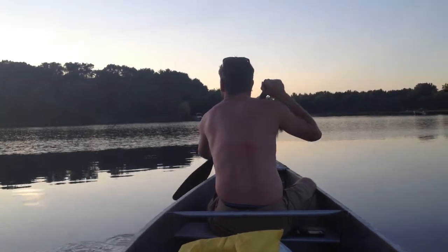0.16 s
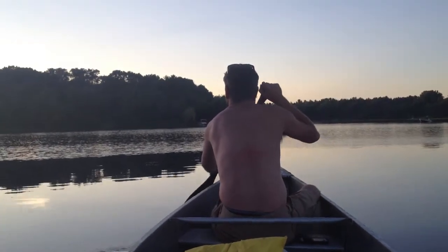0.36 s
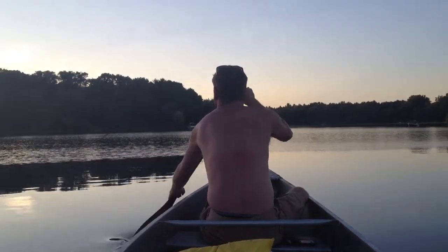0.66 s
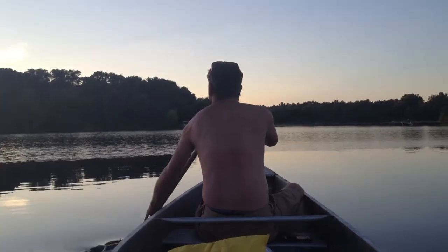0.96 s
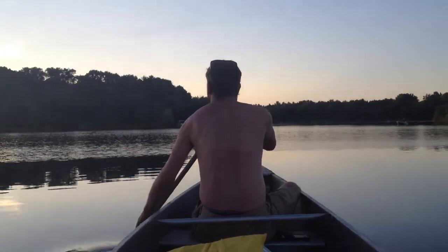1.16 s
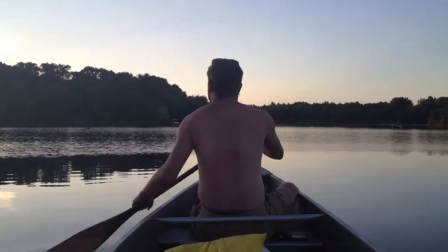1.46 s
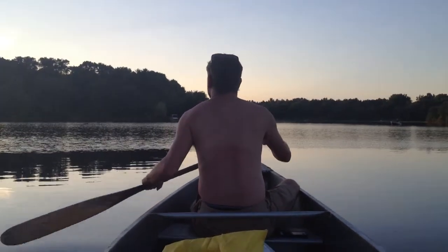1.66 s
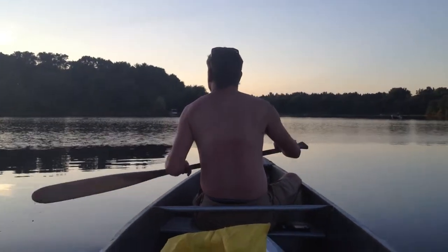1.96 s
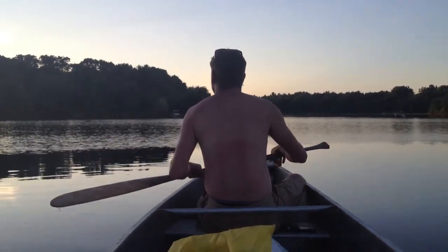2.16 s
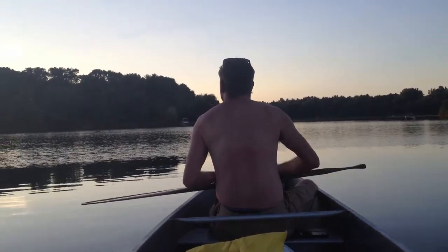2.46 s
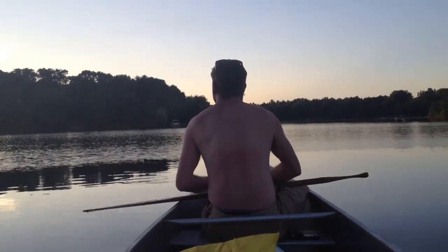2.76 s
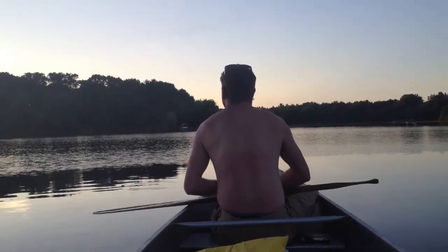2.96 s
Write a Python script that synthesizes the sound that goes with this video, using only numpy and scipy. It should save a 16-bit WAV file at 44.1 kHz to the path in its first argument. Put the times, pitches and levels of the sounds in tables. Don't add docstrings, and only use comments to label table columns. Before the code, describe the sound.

Near the microphone, water softly gurgles around a paddle and drops plink as it lifts; hands rub the shaft, then it knocks sharply on the aluminium hull, ringing briefly over a faint outdoor hum.

```python
import sys
import numpy as np
from scipy import signal
from scipy.fft import rfft, irfft
from scipy.io import wavfile

SR = 44100
rng = np.random.default_rng(int(sys.argv[2]) if len(sys.argv) > 2 else 0)


def nominal_scale(level):
    x = np.asarray(level, float) / 20
    return 10 ** x


def unload_wav(signal):
    wavfile.write(
        sys.argv[1],
        SR,
        np.round(np.clip(np.atleast_2d(signal).T, -1, 1) * 32767).astype(np.int16),
    )


N = 136710
TOP_HZ = 15450


def rms_one(x):
    return x / np.sqrt(np.mean(x ** 2) + 1e-20)


def level(rows):
    seconds, db = np.transpose(rows)
    return nominal_scale(np.interp(np.arange(N) / SR, seconds, db))


def at_hz(points, hz, column=1):
    points = np.array(points)
    return np.interp(np.log(hz), np.log(points[:, 0]), points[:, column])


def drift(rate_hz):
    hop = 40
    pole = np.exp(-2 * np.pi * hop * rate_hz / SR)
    white = rng.standard_normal(N // hop + 2002)
    slow = signal.lfilter([1], [1, -2 * pole, pole * pole], white)[2000:]
    return np.interp(np.arange(N) / hop, np.arange(len(slow)), rms_one(slow))


def ring(clicks, hz, t60):
    radius = 1000.0 ** (-1 / (t60 * SR))
    angle = 2 * np.pi * hz / SR
    poles = [1, -2 * radius * np.cos(angle), radius * radius]
    return signal.lfilter([0, np.sin(angle)], poles, clicks + 1e-18)


def coloured(spectrum, bumps, patchy_db):
    hz = np.maximum(np.fft.rfftfreq(N, 1 / SR), 1)
    db = at_hz(spectrum, hz)
    for centre, width, gain in bumps:
        db = db + gain * np.exp(-((hz - centre) / width) ** 2)
    full = rfft(rng.standard_normal(N)) * nominal_scale(db) * (hz < TOP_HZ)
    octave = np.clip(np.log2(hz / 30), 0, 9)
    out = np.zeros(N)
    for k in range(10):
        overlap = np.clip(1 - abs(octave - k), 0, 1)
        out += irfft(full * overlap, N) * nominal_scale(patchy_db * drift(8.2))
    return rms_one(out)


# frequency in Hz, density in dB per Hz.
AIR_SPECTRUM = [(15, -89), (25, -38.5), (194, -2), (686, -9), (923, -7), (2370, -26.5), (3270, -33),
                (3640, -29.5), (15600, -34.5)]
# centre in Hz, width in Hz, height in dB.
AIR_BUMPS = [(117.7, 31, 8), (950, 54, 1.5), (7500, 1000, 2), (10400, 1380, -9)]


def distant_air():
    return nominal_scale(-57) * coloured(AIR_SPECTRUM, AIR_BUMPS, patchy_db=.5)


# time in seconds, level in dB.
INSECT_LEVEL = [
    (.45, -96),
    (.55, -80),
    (1.18, -80),
    (1.27, -92),
    (1.7, -88),
    (1.9, -80),
    (3.1, -82),
]


def insects():
    hz, width_hz = 4550, 270
    hiss = rng.standard_normal(N)
    for _ in range(2):
        hiss = ring(hiss, hz, 2.2 / width_hz)
    return level(INSECT_LEVEL) * rms_one(hiss) * nominal_scale(4.8 * drift(34.0))


# time in seconds, level in dB.
SLIDE_LEVEL = [(0, -73.5), (1.66, -82), (1.78, -66), (1.98, -62.5), (2.08, -69), (2.16, -64), (2.26, -67.5),
               (2.6, -67.5), (2.78, -71.5), (2.95, -72.5), (3.1, -73)]
# frequency in Hz, density in dB per Hz.
SLIDE_SPECTRUM = [(2500, -16.5), (4500, -7), (6500, -1), (8300, 1.5), (9800, -11), (12500, -13.5),
                  (15000, -10)]


def sliding_hands():
    grip = nominal_scale(1.26 * drift(130.0) + 0.56 * drift(25.0))
    rub = coloured(SLIDE_SPECTRUM, [(12800, 1200, 2.5)], patchy_db=2.5)
    return level(SLIDE_LEVEL) * grip * rub


# time in seconds, level in dB.
FLOW_LEVEL = [(0, -107), (.47, -80), (.53, -65), (.64, -65.5), (.78, -73), (1.3, -68.5), (1.6, -74),
              (1.86, -60.5), (2.15, -66.5), (2.3, -73), (2.72, -73), (2.76, -62), (3.1, -73)]
# frequency in Hz, density in dB per Hz.
WASH_SPECTRUM = [(900, -27), (1500, -2), (2300, -1.5), (3500, -6), (5500, -16.5), (8000, -50)]


def wash():
    surge = nominal_scale(-4.5 + 2.6 * drift(40.0))
    return surge * level(FLOW_LEVEL) * coloured(WASH_SPECTRUM, [], patchy_db=3.0)


def gurgle():
    births_per_s, cycles = 900, 36
    sizes = nominal_scale(3.0 * np.minimum(rng.exponential(1, N), 4)) * rng.choice([-1, 1], N)
    born = rng.random(N) < births_per_s * nominal_scale(3.0 * drift(8.0)) / SR
    dealt = rng.integers(0, 30, N)
    out = np.zeros(N)
    for k, hz in enumerate(np.geomspace(1100, 3300, num=30)):
        pulse = ring(sizes * born * (dealt == k), hz, cycles / hz)
        out += hz ** 0.87 * ring(pulse, 1.16 * hz, 0.31 * cycles / hz)
    return nominal_scale(-2.5) * level(FLOW_LEVEL) * rms_one(out)


# start in seconds,
# peak in dB, pitch in Hz, glide as share of pitch per 10 ms.
BLADE_DROPS = [(0.39, -54, 3000, -0.14), (0.584, -51.5, 3730, -0.039), (.905, -44, 1190, 0.11),
               (0.981, -45.5, 1366, 0.12), (1.026, -53, 3460, 0.057), (1.055, -50, 2000, 0.095),
               (1.114, -40, 1585, -0.51), (1.232, -48.5, 2400, -0.18), (1.268, -47.5, 1060, 0.27),
               (1.293, -40, 1444, -0.0086), (1.485, -39.5, 950, 0.049), (1.527, -47.5, 3400, -0.033),
               (1.623, -51.5, 3300, 0.085), (1.663, -50, 1660, 0.096), (1.717, -41, 1407, 0.071),
               (1.779, -36, 2470, 0.0064), (1.829, -41, 2680, -0.065), (1.836, -43.5, 950, -0.018),
               (1.843, -39.5, 2680, -0.34), (1.852, -32, 2450, -0.001), (1.873, -47, 1830, 0.11),
               (1.904, -44.5, 3180, -0.15), (1.958, -40, 4340, 0.13), (1.977, -45, 2610, 0.13),
               (1.993, -43, 1700, 0.031), (2.033, -37, 2510, -0.59), (2.072, -46, 2500, 0.11),
               (2.086, -54, 2720, 0.062), (2.105, -38, 1940, 0.0027), (2.126, -40, 2520, -0.14),
               (.463, -54.5, 2370, -.08), (0.513, -50, 2020, -.1), (0.515, -57, 1390, .02),
               (.533, -49, 2250, .02), (.548, -49, 3220, .02), (.552, -53, 2000, 0.072),
               (.565, -53, 2030, .02), (.583, -49, 2090, 0.052), (.61, -50, 2370, .1),
               (.617, -50, 2650, .04), (.668, -60, 1840, -.05), (.705, -53, 3300, .04),
               (.743, -51, 1790, -0.092), (.862, -58, 1640, .02), (.971, -57, 2450, .03),
               (1.246, -53, 2350, -.04), (1.316, -53, 2000, .02), (1.35, -51, 1940, -0.029),
               (1.397, -53, 2200, 0.029), (1.486, -60, 3020, -.05),
               (2.105, -37, 2650, 0.013), (2.125, -45, 1240, -0.22), (2.166, -47.5, 2000, 0.55),
              (2.234, -49, 2100, -0.13), (2.306, -49.5, 2000, -0.14), (2.745, -46.5, 2230, -0.25),
              (2.761, -50, 1610, -0.12), (2.76, -49, 3230, .01), (2.78, -48, 2230, 0.037),
              (2.803, -36.5, 2010, 0.11), (2.938, -44.5, 2820, 0.047), (2.94, -46.5, 1950, 0.04)]


def drops():
    cycles, rise_s = 25.4, 0.00053
    out, t = np.zeros(N + 4000), np.arange(2600) / SR
    flutter = signal.lfilter([.1], [1, -.9], rng.standard_normal(len(out))) / .23
    for s, db, hz, glide in BLADE_DROPS:
        start = int(s * SR)
        here = slice(start, start + len(t))
        pitch = hz * (1 + glide * np.minimum(t, .022) / .01)
        bubble = np.sin(2 * np.pi * np.cumsum(pitch) / SR)
        slow = 1 + 7 * np.clip(glide, 0, .2)
        swell = 1 - np.exp(-t / (rise_s * slow ** 2))
        shape = swell * nominal_scale(-60 * t * hz / (cycles * slow))
        splat_db = -20.5 - 92 * np.clip(glide, -.1, 0)
        splat = np.exp(-t / 0.00049) * np.sin(2 * np.pi * (0.36 * hz + 2440.0) * t)
        rough = 1 + 0.3 * flutter[here]
        out[here] += nominal_scale(db + 3.0) * (bubble * shape * rough + nominal_scale(splat_db) * splat)
    return out[:N]


# start in seconds, peak in dB, centre in Hz,
# t60 in seconds.
TICKS = [(0.0277, -33, 5940, 0.0086), (0.0888, -58, 7200, .01), (0.2865, -49, 6440, 0.026),
         (.414, -60, 12500, .008), (0.4298, -44.5, 5360, 0.091), (.432, -55, 12000, 0.034),
         (1.113, -47, 2500, 0.012), (0.502, -51, 7500, 0.0092), (.597, -53, 5330, 0.05),
         (0.9724, -54.5, 7300, 0.018), (1.112, -58, 7500, .012), (1.502, -52, 7400, 0.0099),
         (1.68, -54, 6400, .015), (1.7168, -52, 7000, .012), (1.7823, -60, 13000, 0.014),
         (1.8526, -41.5, 6560, 0.021), (2.0007, -45.5, 7300, 0.011), (2.1086, -50.5, 12200, 0.017),
         (2.15, -45, 14500, .03), (2.149, -51.5, 7500, 0.064), (2.4239, -57, 14000, .01),
         (2.443, -52, 7590, 0.017), (2.5227, -47.5, 7900, 0.015), (0.0273, -42, 8700, 0.0055),
         (2.7686, -57, 7630, 0.015), (2.867, -41, 6600, 0.058), (2.918, -46.5, 7600, 0.054),
         (2.973, -53, 7600, 0.014), (2.867, -51, 13500, .04), (.431, -48, 8160, .04),
         (.0275, -54, 2500, .008), (.71, -57, 6500, .015), (.8515, -59.5, 8000, .01),
         (.927, -57, 6490, .012), (1.38, -55.5, 7050, .012), (1.742, -60, 12800, 0.014),
         (1.759, -54.5, 7730, .012), (1.797, -58, 13500, .012), (1.808, -58, 13000, .015),
         (1.84, -60, 12000, .015), (1.949, -50, 7660, 0.011), (1.967, -53, 7760, .012),
         (1.993, -47.5, 6460, 0.019), (3.045, -52.5, 7030, 0.024)]


def ticks():
    out, t = np.zeros(N + 4000), np.arange(3000) / SR
    edge = signal.butter(4, [12000, TOP_HZ + 500], "band", fs=SR, output="sos")
    for s, db, hz, t60 in TICKS:
        start = int(s * SR)
        width_hz = min(hz * 0.32, 1700)
        limits = np.clip([hz - width_hz / 2, hz + width_hz / 2], 100, TOP_HZ + 500)
        resonance = signal.butter(2, limits, "band", fs=SR, output="sos")
        dying = rng.standard_normal(len(t)) * nominal_scale(-60 * t / t60)
        burst = signal.sosfilt(resonance, dying) + nominal_scale(-27) * signal.sosfilt(edge, dying)
        out[start:start + len(t)] += nominal_scale(db) * burst / np.abs(burst).max()
    return out[:N]


# start in seconds, strength in dB, hardness in Hz.
CONTACTS = [
    (.428, -49.5, 4930),
    (2.8093, -35.5, 7000),
    (2.8129, -32, 14200),
    (2.8142, -23.5, 9200),
    (2.818, -23.5, 4970),
    (2.822, -22.5, 1100),
    (2.8661, -36, 2000),
    (2.9178, -43, 1000),
    (2.97, -38, 500),
]
# frequency in Hz, level in dB, t60 in seconds.
HULL_MODES = [(129.9, -13.5, 1), (157.55, -4, 0.75), (173.5, -10.5, 0.65), (195.8, -19, 0.98),
              (243, -7.5, 0.33), (261, -13, 0.32), (313.8, -2, 0.42), (391.2, -2, 0.21),
              (436.7, -3.5, 0.27), (507, -18, 0.39), (661, -11, .3), (694, -15, 0.3), (836, -10.5, 0.21),
              (1020, -12, 0.19)]
# frequency in Hz, level in dB, t60 in seconds.
SHAFT_MODES = [(239, 7, 0.032), (351, -18.5, 0.33), (408, -9.5, 0.18), (725, -8.5, 0.082), (965, -19, .12),
               (1211, -16.5, 0.11), (1372, -12, 0.12), (1438, -5.5, 0.061), (1503, -1.5, 0.018),
               (1758, -10, 0.12), (1906, -6.5, 0.14), (2223, -20, 0.061), (3206, -4.5, 0.03)]
# frequency in Hz, level in dB, t60 in seconds.
SHEET_TREND = [(250, -9.5, 0.89), (500, -20, 0.53), (1000, -10, 0.25), (2000, -7.5, 0.11),
               (4150, -24, 0.089), (7300, -6.5, 0.036), (10500, -28.5, 0.037), (14500, -24, .04)]


def knock():
    hull_db, sheet_db = -4, -17
    out, t = np.zeros(N + SR), np.arange(SR // 3) / SR
    sheet_hz = np.sort(140 * 110 ** rng.random(700) ** .65)
    sheet = [(hz, sheet_db + at_hz(SHEET_TREND, hz), at_hz(SHEET_TREND, hz, column=2)) for hz in sheet_hz]
    hull = [(hz, hull_db + db, t60) for hz, db, t60 in HULL_MODES]
    hz, db, t60 = np.transpose(SHAFT_MODES + hull + sheet)[:, :, None]
    rings = nominal_scale(db - 60 * t / t60) * np.sin(2 * np.pi * hz * t)
    rings = rings * (1 - np.exp(-t * hz / .35))
    share = nominal_scale(2.24 * rng.standard_normal((len(CONTACTS), len(hz))))
    share[:, -len(sheet):] *= rng.choice([-1, 1], (len(CONTACTS), len(sheet)))
    for (s, strength_db, hard_hz), strengths in zip(CONTACTS, share):
        start = int(s * SR)
        soften = signal.butter(2, min(hard_hz, 20000), fs=SR)
        lighten = signal.butter(1, hard_hz / 20, "high", fs=SR)
        body = signal.lfilter(*soften, strengths @ rings)
        body = signal.lfilter(*lighten, body)
        out[start:start + len(t)] += nominal_scale(strength_db) * body
    return out[:N]


def scene():
    background = distant_air() + insects()
    water = wash() + gurgle() + drops()
    canoe = sliding_hands() + ticks() + knock()
    return (background + water + canoe)[None]


def low_pass(x):
    return signal.sosfilt(signal.butter(12, 15640, fs=SR, output="sos"), x)


def record(dry):
    low_cut = signal.butter(2, 126, "high", fs=SR, output="sos")
    mix = signal.sosfilt(low_cut, dry)
    return low_pass(mix)


dry = scene()
out = record(dry)
unload_wav(out)
```